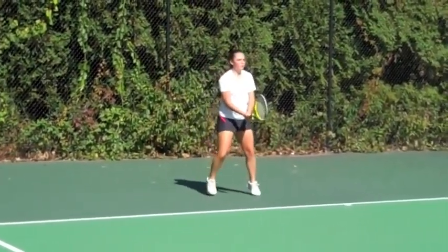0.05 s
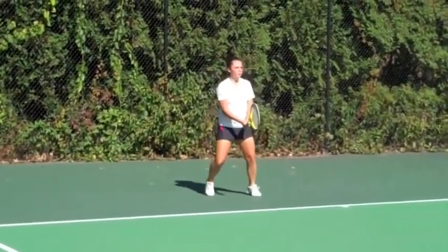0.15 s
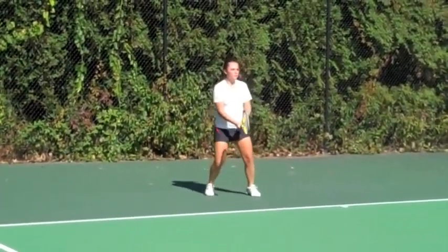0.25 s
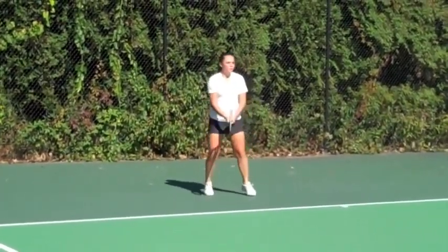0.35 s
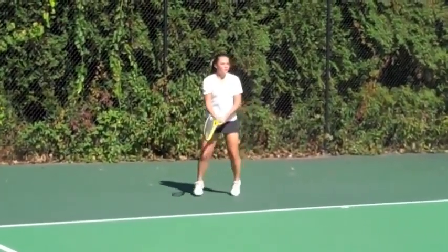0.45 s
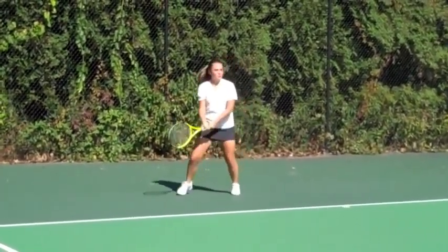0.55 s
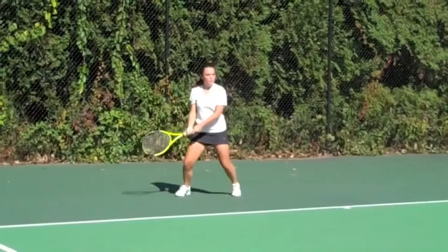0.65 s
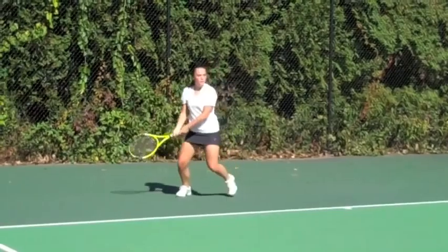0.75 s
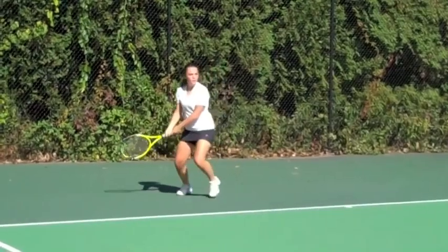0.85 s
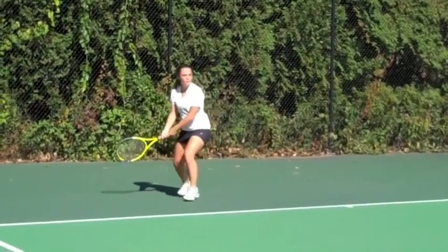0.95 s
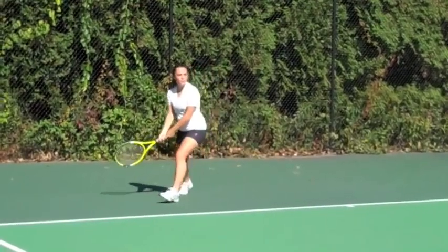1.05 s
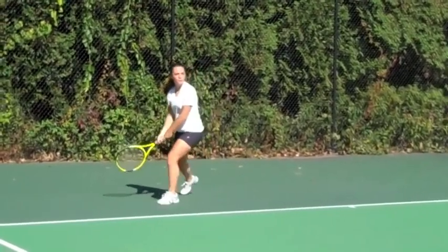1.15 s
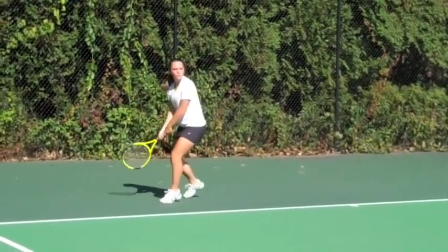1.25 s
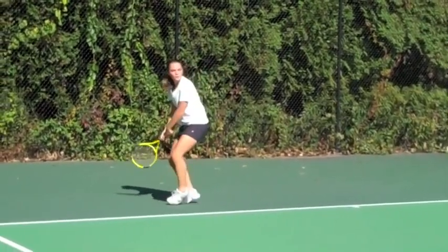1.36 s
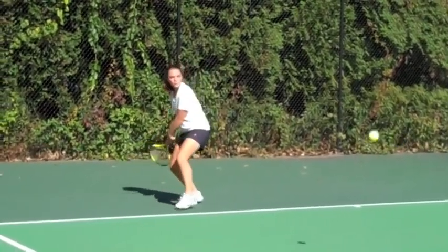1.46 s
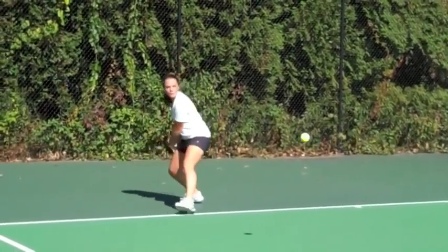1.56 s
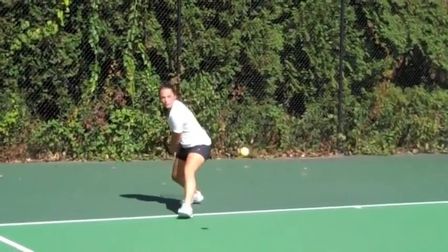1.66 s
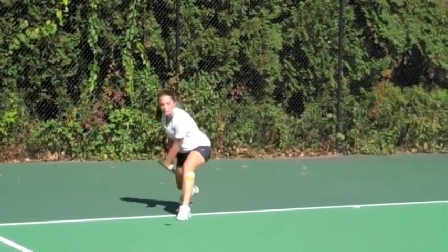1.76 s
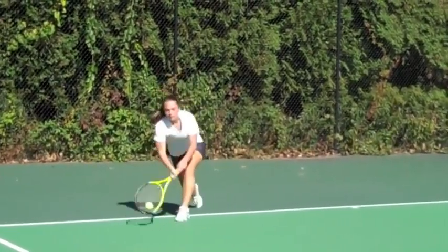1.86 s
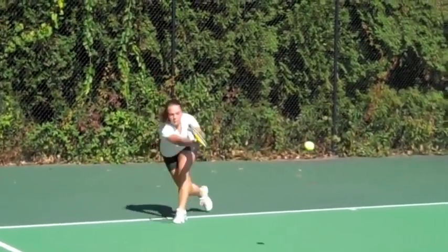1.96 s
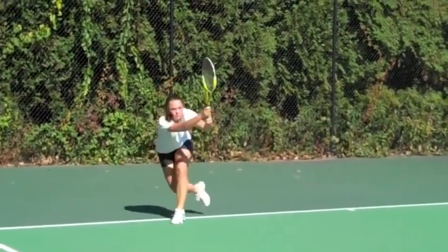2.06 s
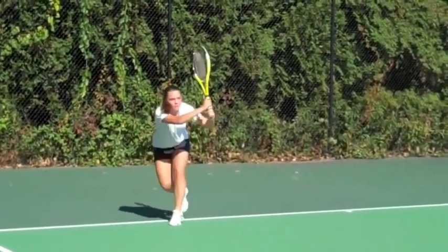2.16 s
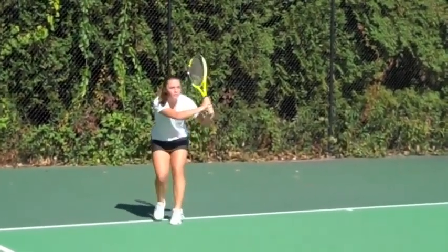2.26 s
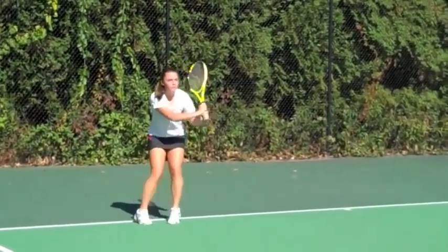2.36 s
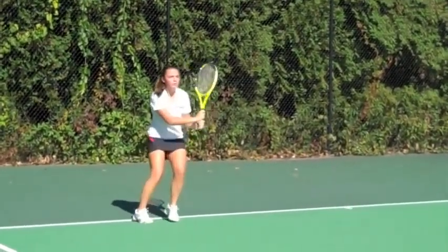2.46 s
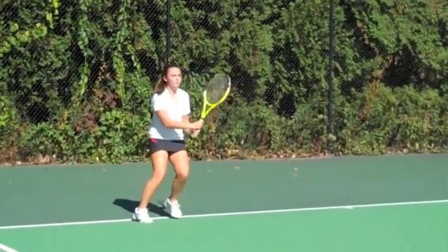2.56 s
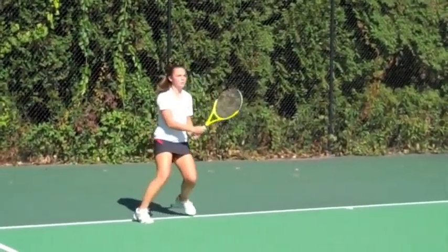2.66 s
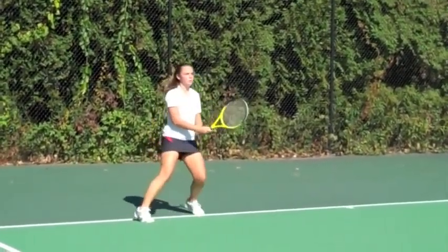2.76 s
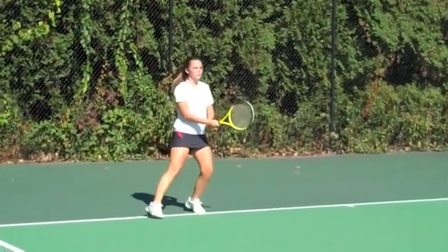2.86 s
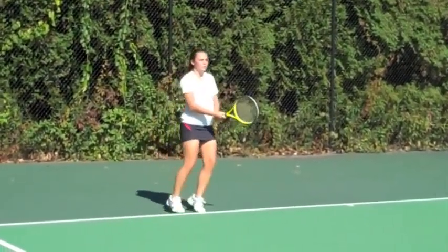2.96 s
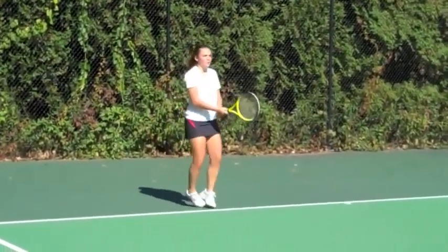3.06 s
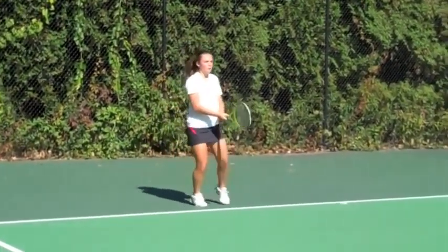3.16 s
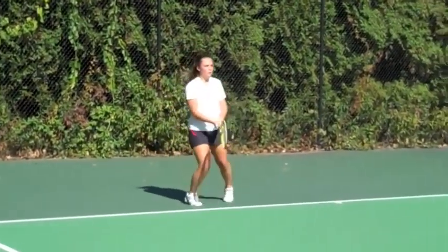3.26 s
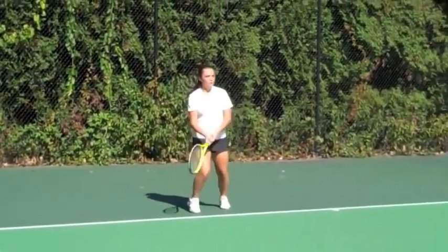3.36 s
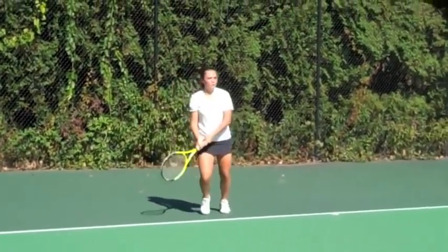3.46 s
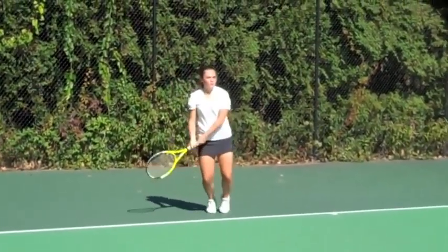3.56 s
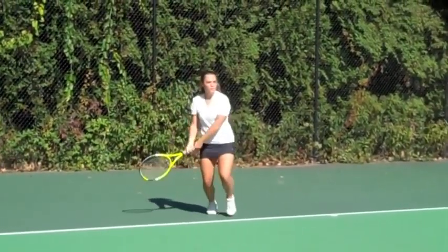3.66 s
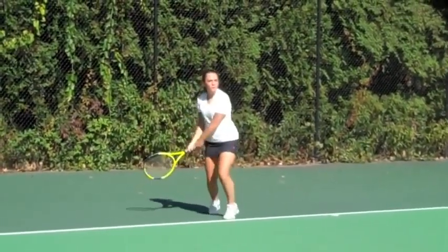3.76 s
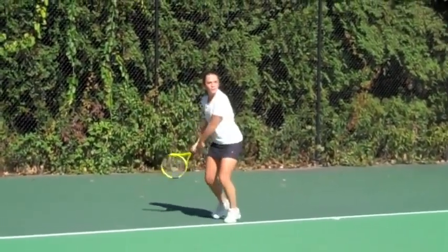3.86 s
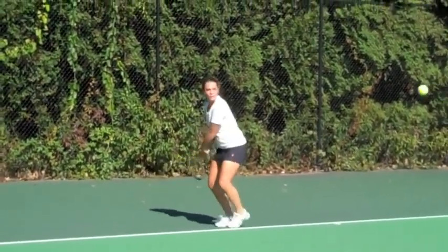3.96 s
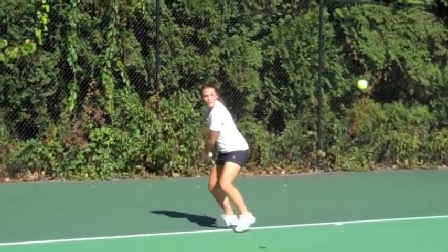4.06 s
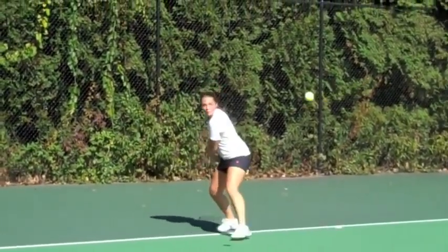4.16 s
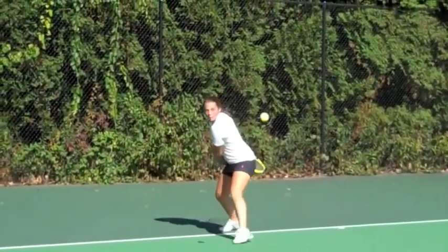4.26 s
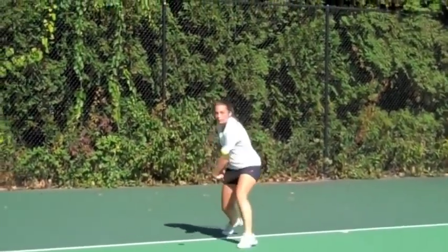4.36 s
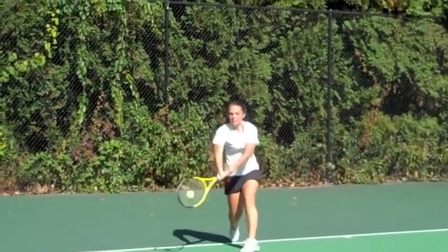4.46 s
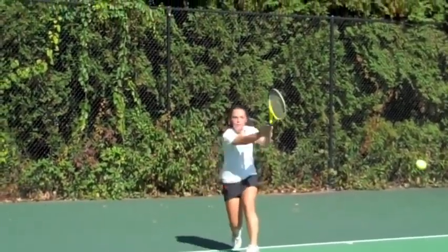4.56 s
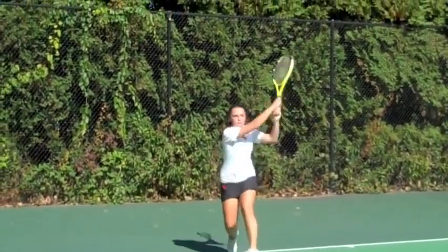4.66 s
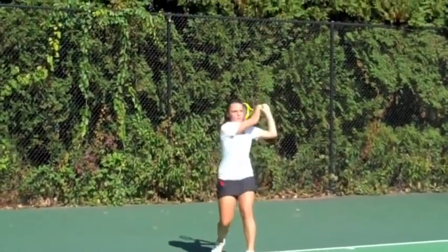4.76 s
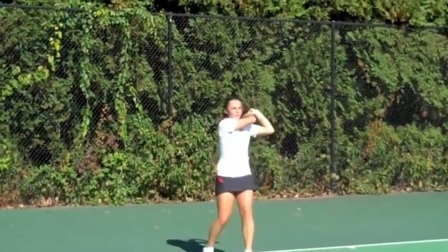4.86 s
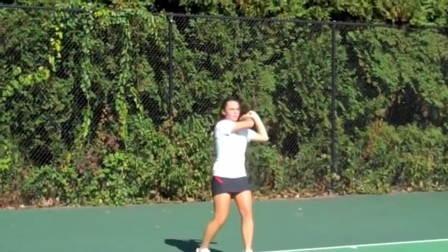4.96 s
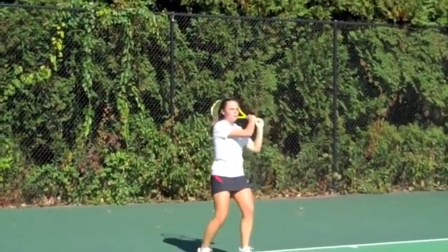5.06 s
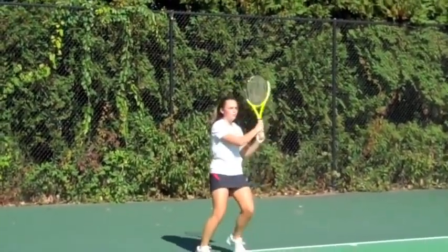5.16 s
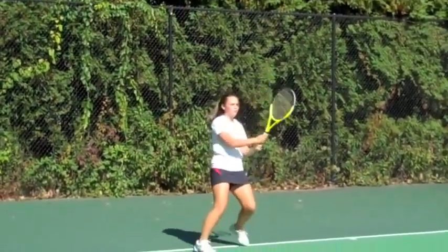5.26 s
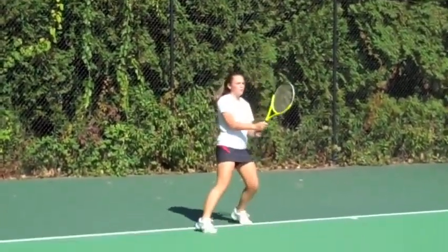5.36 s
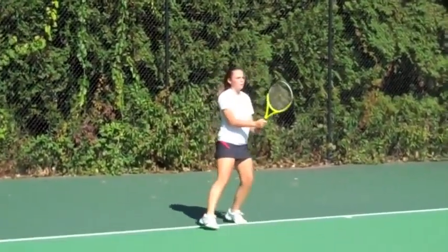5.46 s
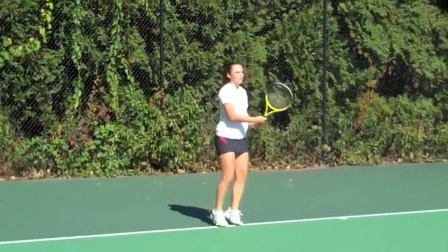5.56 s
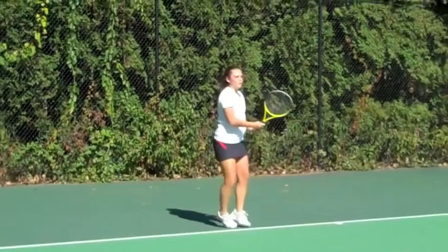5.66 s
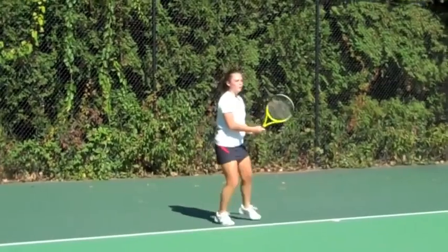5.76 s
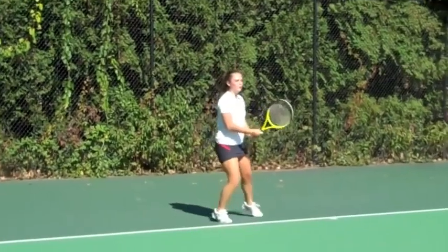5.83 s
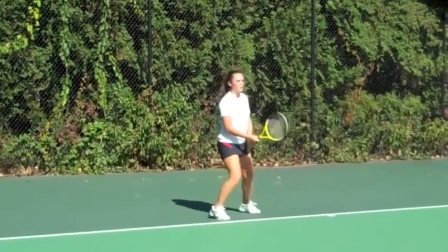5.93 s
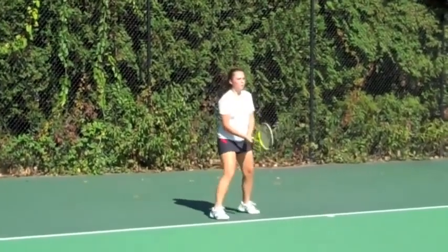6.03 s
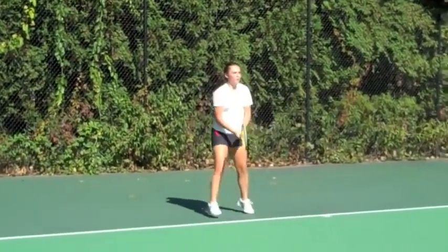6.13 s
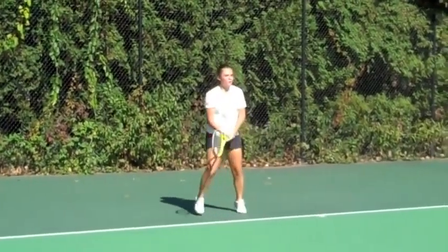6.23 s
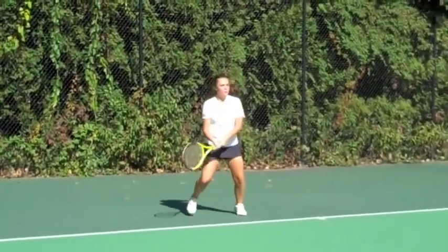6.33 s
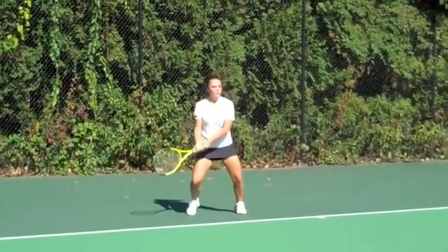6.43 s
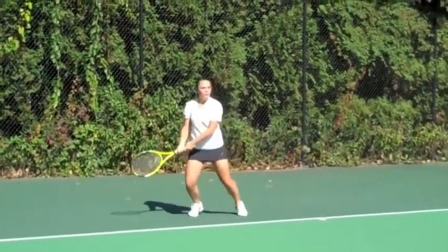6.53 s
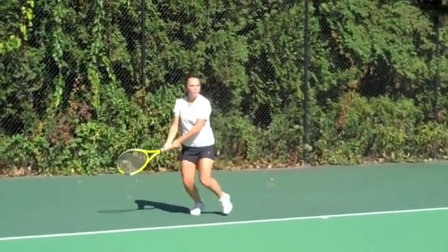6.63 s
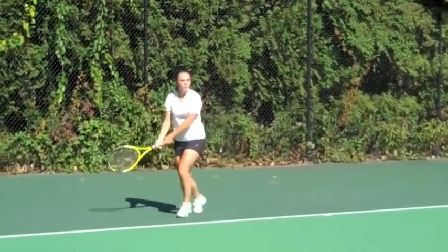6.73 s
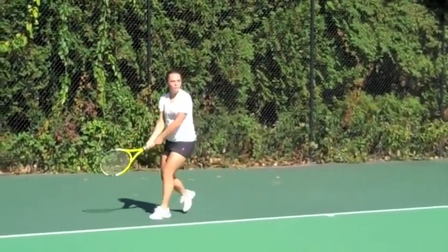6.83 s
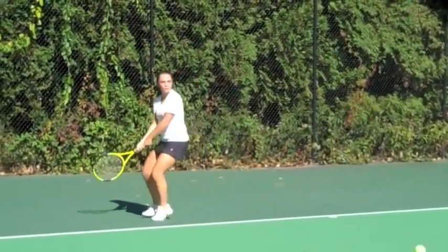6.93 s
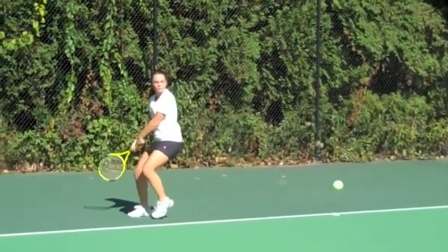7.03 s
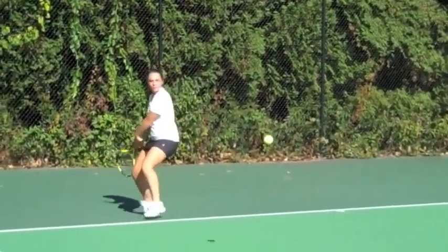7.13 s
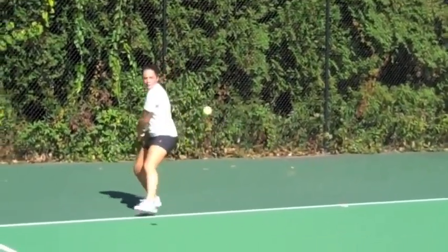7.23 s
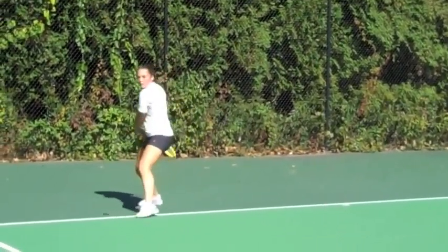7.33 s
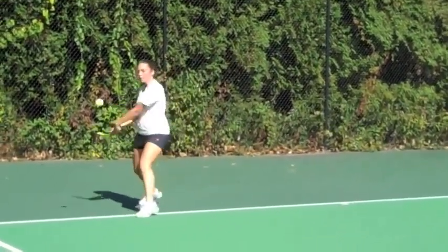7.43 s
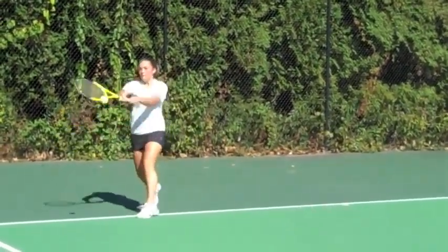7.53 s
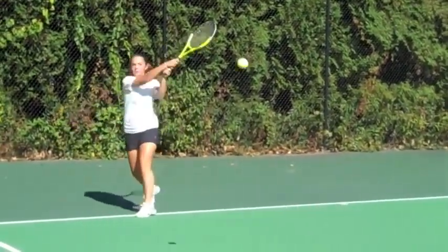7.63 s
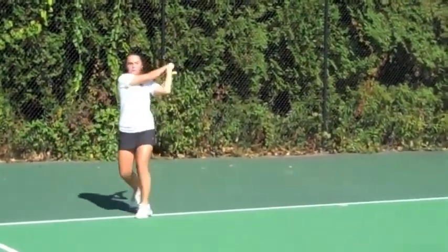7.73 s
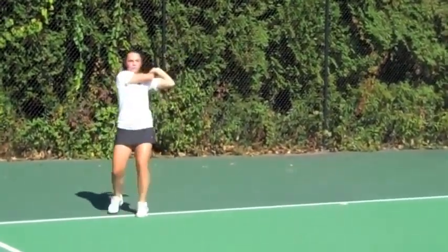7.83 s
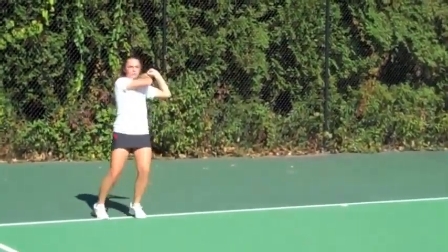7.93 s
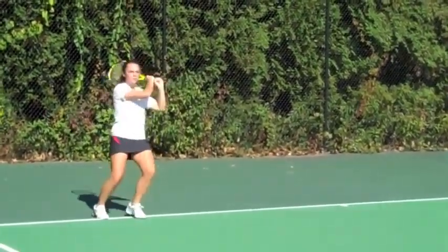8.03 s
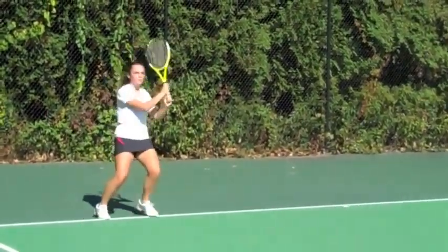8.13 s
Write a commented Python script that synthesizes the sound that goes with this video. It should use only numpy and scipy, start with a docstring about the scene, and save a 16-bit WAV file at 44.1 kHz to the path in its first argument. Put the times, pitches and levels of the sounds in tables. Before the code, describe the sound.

A tennis rally on an outdoor hard court, in stereo, over quiet traffic and faint hiss. A very faint far hit at 0.2 s is followed by light shoe scuffs, a weak far bounce and a clear slap at 1.1 s. At 1.9 s the near racket gives a loud, hollow, ringing pock with a diffuse hedge echo. A softer far hit answers at 2.8 s, overlapped by a dull distant thud that rolls away from 2.9 s. Scuffs lead to a strong bounce at 3.5 s, another at 3.8 s, then a loud stringy pock at 4.5 s. A fainter thud comes near 5 s, a bounce at 5.5 s and a weak far hit at 5.9 s. Footwork grates, a bounce slaps at 6.9 s, a shoe squeaks sharply at 7.0 s, and the last loud pock lands at 7.5 s, then a scuff and a faint low hum swelling.

```python
"""Outdoor tennis rally

Rackets pock (string crack, air push, ringing ball), the ball slaps the hard court and rings, shoes
scuff and squeak; strings swish as shaped noise. A tall hedge and fence return a late, diffuse echo
made of scattered noise. Two dull thuds roll round the surroundings; far squeaks, traffic, a hum and
a faint hiss lie underneath. The left microphone is the brighter one."""
import sys
import numpy as np
from scipy import signal
from scipy.fft import rfft, irfft, next_fast_len
from scipy.io import wavfile
from scipy.ndimage import map_coordinates

SR = 44100
rng = np.random.default_rng(int(sys.argv[2]) if len(sys.argv) > 2 else 0)


def materialize(psi):
    """Save the field psi as 16-bit PCM at rate SR to the path in sys.argv[1].

    A 1-D psi becomes a single channel; in a 2-D psi each row is a channel.
    """
    bounded = np.clip(np.atleast_2d(psi).T, -1, 1)
    quanta = np.round(bounded * 32767).astype(np.int16)
    wavfile.write(sys.argv[1], SR, quanta)


N = 361179
TIME_S = np.arange(N) / SR
AGE_S = TIME_S[:SR // 4]  # time since the start of one event
FLUTTER_DB = 2  # unevenness of scuffs and rolling echoes

# Colour of felt or sole rubbing on court grit. Each row: frequency in Hz, relative level in dB.
GRIT_COLOUR = [(300, -22), (1200, -11), (2500, -12), (4000, -3.5), (6200, 4.5), (8000, 4.5), (9500, -9),
               (13800, -20), (14800, -52)]
# Left-right likeness of echoes. Each row: frequency in Hz, likeness from 0 to 1.
ECHO_LIKENESS = [(300, 1), (1000, 0.89), (2500, 0.75), (6000, 0.067)]


def amp(db):
    """Decibels to gain."""
    return 10 ** (np.asarray(db) / 20)


def unit(x):
    """Scale to rms 1."""
    return x / np.sqrt(np.mean(x ** 2) + 1e-20)


def along(points, hz):
    """Interpolate (Hz, value) points on a log frequency axis."""
    point_hz, values = np.transpose(points)
    return np.interp(np.log(hz + 1), np.log(point_hz + 1), values)


def filtered(x, response):
    """Apply a frequency response, zero-padded by at least 0.1 s."""
    n = x.shape[-1]
    padded = next_fast_len(n + SR // 10)
    spectrum = rfft(x, padded) * response(np.fft.rfftfreq(padded, 1 / SR))
    return irfft(spectrum, padded)[..., :n]


def high_pass(x, hz):
    """Third-order high-pass: a small source radiates little bass."""
    return signal.sosfilt(signal.butter(3, hz, "highpass", fs=SR, output="sos"), x)


def noise(colour, shape):
    """Coloured noise of rms 1."""
    return unit(filtered(rng.standard_normal(shape), lambda hz: amp(along(colour, hz))))


def wobble(x):
    """Smooth random curve with one knot per unit of x."""
    return map_coordinates(rng.standard_normal(int(x.max()) + 4), [x])


def spread(pair, likeness):
    """Mix two unrelated noises into a left and right of given likeness."""
    def mid_side_gains(hz):
        angle = np.arccos(np.clip(along(likeness, hz), -1, 1)) / 2
        return np.array([np.cos(angle), np.sin(angle)])

    mid, side = filtered(pair, mid_side_gains)
    return np.array([mid + side, mid - side])


def click(colour):
    """Minimum-phase pulse of peak 1 with the given colour."""
    n = len(AGE_S)
    log_gain = np.log(amp(along(colour, np.fft.rfftfreq(n, 1 / SR))))
    cepstrum = irfft(log_gain, n)
    pulse = irfft(np.exp(rfft(2 * cepstrum[:n // 2], n)), n)
    return pulse / np.abs(pulse).max()


def swell(t, peak, rise, fall):
    """Bell-shaped envelope with its own rise and fall."""
    return np.exp(-np.minimum(((t - peak) / np.where(t < peak, rise, fall)) ** 2, 20))


def ring(hz, t60, start, attack):
    """Damped mode that builds up from its start; times in seconds."""
    u = np.maximum(AGE_S - start, 0)
    return np.sin(2 * np.pi * hz * u) * amp(-60 * u / t60) * (1 - np.exp(-u / attack))


def add(track, start_s, sound):
    """Mix an event into a track."""
    part = track[..., round(start_s * SR):][..., :len(AGE_S)]
    part += sound[..., :part.shape[-1]]


def strokes():
    """Strings crack and push the air while holding the ball; released, its hollow shell rings near 1 kHz.
    Returns the direct stereo sound and what radiates toward the hedge."""
    # Each row: start in seconds, end of the court, crack level in dB, ball level in dB (before the
    # 5.5 dB lift and high-pass), ball Hz, ball t60 in s, push level in dB, push Hz, string level in dB.
    stroke_rows = [(0.2264, "far", -47, -20.5, 1237, 0.014, -32.5, 230, -50),
                   (1.9025, "near", -14.5, 14.5, 958, 0.0095, -3.5, 534, -41),
                   (2.7765, "far", -23.5, 0.5, 1027, 0.029, -18, 486, -38),
                   (4.5054, "near", -11.5, -8, 907, 0.022, -12, 387, -25.5),
                   (5.9286, "far", -37.5, -12, 1160, 0.0077, -32, 269, -47.5),
                   (7.5340, "near", -12.5, 7.5, 1076, 0.014, -18, 330, -37)]
    # String-bed modes. Each row: Hz, relative level in dB, t60 in s.
    string_modes = [(501, 5, 0.027), (1110, 4, 0.047), (1418, -2, 0.11), (1600, -6, .025), (1866, 6, 0.041),
                    (2080, 7, 0.022), (2275, 6, 0.085), (2590, -28, .04), (3760, -27, .035),
                    (4530, -25, .025)]
    # Crack spectrum. Each row: Hz, relative level in dB.
    crack_colour = [(200, -40), (750, 2), (1400, 8.5), (2000, -2), (3000, -4), (3700, -2.5), (5000, -1.5),
                    (6500, 1), (8200, -2), (10000, -13.5), (14000, -20.5), (16500, -53)]
    # Each end of the court: lag of the left microphone in samples, extra way to the hedge in s,
    # ring toward the hedge over the crack in dB.
    court_ends = {"near": (0.56, 0, 15.6), "far": (7.3, 0.051, 22)}
    dwell_s, push_half_s = 0.0034, 0.0015  # ball on the strings; half length of the air push
    ground_delay_s, ground_db = 0.0063, -17  # the court's reflection
    out, away = np.zeros((2, N)), np.zeros(N)
    contact = swell(AGE_S, 0.0017, 0.0009, 0.0031) + amp(-15) * amp(-60 * AGE_S / 0.04)
    for start_s, end, crack_db, ball_db, ball_hz, ball_t60_s, push_db, push_hz, string_db in stroke_rows:
        lag, way_s, away_db = court_ends[end]
        crack_noise = spread(noise(crack_colour, (2, len(AGE_S))), [(1500, 0.66), (8000, 0.9)])
        crack = amp(crack_db) * contact * crack_noise
        push = np.sin(2 * np.pi * push_hz * (0.0024 - AGE_S))
        push = amp(push_db) * push * swell(AGE_S, 0.0028, push_half_s, push_half_s)
        shell = ring(ball_hz, ball_t60_s, dwell_s, attack=0.0032)
        ball = amp(ball_db + 5.5) * high_pass(shell, hz=770)
        strings = np.zeros(len(AGE_S))
        for hz, db, t60_s in string_modes:
            mode_gain = amp(db + rng.normal(0, 1))
            strings += mode_gain * ring(hz, t60_s, rng.uniform(0.001, 0.00162), attack=0.0009)
        strings *= amp(string_db)
        pock = high_pass(crack + push + strings, hz=142) + ball
        # half the lag delays the left, half advances the right
        sides = np.array([[-1], [1]])
        pock = filtered(pock, lambda hz: np.exp(1j * np.pi * hz * lag / SR * sides))
        add(out, start_s, pock)
        add(out, start_s + ground_delay_s, amp(ground_db) * pock)
        add(away, start_s + way_s, high_pass(crack[0] + push + amp(-5) * strings, hz=140))
        away_ring = ring(hz=971, t60=0.046, start=dwell_s, attack=0.0031)
        add(away, start_s + way_s, amp(crack_db + away_db) * away_ring)
    return out, away


def bounces():
    """The ball slaps the court, rings briefly and skids on its felt."""
    # Each row: start in seconds, slap level in dB (before a 1.5 dB cut), shell ring level in dB.
    bounce_rows = [(0.562, -35, -36), (1.0743, -15.5, -19), (1.15, -28, -52), (1.731, -27.5, -58),
                   (3.548, -9, -19), (3.8037, -19, -35), (5.496, -25, -29), (6.427, -36, -30),
                   (6.8992, -13, -17.5), (7.326, -45, -35.5), (7.3455, -25, -54)]
    # Slap spectrum. Each row: Hz, relative level in dB.
    slap_colour = [(60, -38), (200, 7.5), (400, -2.5), (700, -12.5), (1400, 4.5), (2300, 3), (3500, -9),
                   (5000, -10), (6800, -1), (9500, -19), (15000, -32)]
    shell_hz, skid_db = 1014, -39  # skid level relative to the slap column
    out, slap = np.zeros(N), click(slap_colour)
    for start_s, slap_db, ring_db in bounce_rows:
        shell = amp(ring_db) * ring(shell_hz, t60=0.023, start=0.00015, attack=0.0006)
        skid_envelope = swell(AGE_S, 0.0025, 0.021, 0.02)
        skid = amp(slap_db + skid_db) * noise(GRIT_COLOUR, len(AGE_S)) * skid_envelope
        add(out, start_s, amp(slap_db - 1.5) * slap + shell + skid)
    return out


def footwork():
    """Soles catch, drag over grit in tiny slips and let go; more weight adds a lower rasp."""
    # Each row: start in seconds, length in s, mid-scuff level in dB, swell from start to end in dB,
    # heel weight in dB (before a 3.5 dB cut).
    scuff_rows = [(0.128, 0.033, -38, -2, -15), (.17, .036, -43.5, -4, -4.5), (0.51, 0.018, -47.5, -3, -17),
                  (1.38, 0.032, -37.5, 11, -12), (1.666, 0.021, -42, 4, 1), (2.38, 0.028, -34.5, 2, -6),
                  (2.914, 0.016, -30, -11, -4), (3.125, 0.011, -36.5, -2, -4),
                  (3.226, 0.079, -38.5, 9, -27), (3.549, 0.032, -36, -8, -19), (3.966, .02, -41.5, 8, -7),
                  (4.874, 0.059, -39.5, -6, -6.5), (5.676, .029, -37, 4, -2),
                  (5.877, 0.026, -43.5, -2, -15), (6.21, .048, -50, 9, -5.5), (6.423, 0.097, -50, 8, -4),
                  (6.809, 0.034, -37.5, 24, -6), (6.999, .034, -30, 1, -2.5),
                  (7.897, 0.051, -34.5, -10.5, -0.5), (8.087, 0.02, -50.5, 1, -16)]
    # Lower rasp of the weighted sole. Each row: Hz, relative level in dB.
    sole_colour = [(150, -30), (500, -18), (1100, -4.5), (1900, -1), (2700, 2), (4000, 0), (7000, -44)]
    grip_s, release_s = 0.0016, 0.0035  # the sole catches and lets go
    slip_db, ripple_db = 1.8, 1.8  # unevenness of slips and of tread colour
    out, n = np.zeros((2, N)), len(AGE_S)
    for start_s, length_s, db, swell_db, heel_db in scuff_rows:
        release = 1 + np.exp(np.minimum((AGE_S - length_s) / release_s, 30))
        grip = (1 - np.exp(-AGE_S / grip_s)) / release
        drag = amp(db + swell_db * (np.minimum(AGE_S / length_s, 1) - 0.5)) * grip
        slips = unit(amp(slip_db * wobble(1500 * AGE_S) + FLUTTER_DB * wobble(200 * AGE_S)))
        rasp = spread(noise(GRIT_COLOUR, (2, n)), [(2000, 1.0), (8000, 0.75)])
        rasp = rasp + amp(heel_db - 3.5) * noise(sole_colour, n)
        # each footfall has its own resonances
        tread = filtered(rasp, lambda hz: amp(ripple_db * wobble(hz / 400)))
        add(out, start_s, drag * slips * tread)
    return high_pass(out, hz=305)


def swings():
    """Air rushes through the strings around a stroke: noise under a bell envelope."""
    # Each row: peak in seconds, half length in s, level in dB.
    swing_rows = [(1.835, 0.034, -44.5), (4.506, 0.081, -45.5), (7.528, 0.1, -49)]
    # Swish spectrum. Each row: Hz, relative level in dB.
    swish_colour = [(300, -30), (1500, -6), (2400, -1.5), (4000, -5), (7000, 0.5), (10000, -15),
                    (13500, -21), (15000, -58.5)]
    envelope = sum(amp(db) * swell(TIME_S, peak_s, half_s, half_s) for peak_s, half_s, db in swing_rows)
    return noise(swish_colour, N) * envelope


def squeaks(rows, modes):
    """Stick and slip drives narrow resonances of the rubber sole, here as noise through those modes."""
    def rubber(hz):
        return sum(amp(db) / (1 + ((hz - mode_hz) / width_hz) ** 2) for mode_hz, width_hz, db in modes)

    tone = unit(filtered(rng.standard_normal(N), rubber))
    return tone * sum(amp(db) * swell(TIME_S, peak_s, rise_s, fall_s) for peak_s, rise_s, fall_s, db in rows)


def near_squeaks():
    """A sole gripping the court, then its lingering echo."""
    # Each row: peak in seconds, rise in s, fall in s, level in dB.
    squeak_rows = [(7.022, 0.0072, 0.0092, -21.5), (7.06, 0.039, 0.18, -51)]
    # Sole resonances. Each row: Hz, width in Hz, relative level in dB.
    sole_modes = [(2646, 71, 3.5), (2764, 65, 1), (3050, 66, 2.5), (3330, 65, 0.5), (5930, 130, -21),
                  (7640, 220, -16)]
    return squeaks(squeak_rows, sole_modes)


def hedge(x, blur):
    """Countless leaves scatter sound back late: each band's energy returns as noise, blurred in pitch."""
    # Echo colour. Each row: Hz, gain in dB.
    echo_colour = [(100, -17), (400, -16.5), (700, -21.5), (1000, -19.5), (1400, -17), (2200, -13),
                   (4500, -10.5), (8000, -11), (13000, -21.5)]
    clump_db = 2.8  # unevenness of the echo
    hz, t, z = signal.stft(x, SR, nperseg=512, noverlap=384)
    shifted_hz = hz + 50
    blur_width = blur * np.sqrt(shifted_hz[:, None] / 1000)
    weights = np.exp(-(np.log(shifted_hz[:, None] / shifted_hz) / blur_width) ** 2)
    power = weights @ np.abs(z) ** 2 / weights.sum(axis=1, keepdims=True)
    power = signal.fftconvolve(power, echo_power(t[t < 1])[None], axes=1)
    power = np.abs(power)[:, :len(t)]
    paths = signal.stft(rng.standard_normal((2, N)), nperseg=512, noverlap=384)[2]
    echo = paths / paths.std() * np.sqrt(power) * amp(along(echo_colour, hz))[:, None]
    scattered = signal.istft(echo, nperseg=512, noverlap=384)[1][:, :N]
    clumps = unit(amp(clump_db * wobble(90 * TIME_S)))  # branches return it unevenly
    return clumps * spread(scattered, ECHO_LIKENESS)


def echo_power(delay_s):
    """Share of the energy that comes back at each delay: fence, hedge, then a dying tail."""
    # Fence and hedge returns. Each row: peak delay in seconds, rise in s, fall in s, relative level in dB.
    return_rows = [(.045, .02, 0.051, 2), (0.108, 0.16, 0.087, -1)]
    linger_db, linger_rise_s, linger_t60_s = -4.5, 0.02, 2.14  # weak tail from further off
    near = sum((amp(db) * swell(delay_s, s, rise_s, fall_s)) ** 2 for s, rise_s, fall_s, db in return_rows)
    tail = amp(linger_db - 60 * delay_s / linger_t60_s) * (1 - np.exp(-delay_s / linger_rise_s))
    power = near + tail ** 2
    return power / power.sum()


def thuds():
    """A dull blow, one strong return, then a hollow, fluttering echo rolling away."""
    # Each row: start in seconds, blow level in dB, rolling echo level in dB, strong return level in dB.
    thud_rows = [(2.9, -35, -42.5, -37), (4.958, -38, -46, -47.5)]
    # Blow spectrum. Each row: Hz, relative level in dB.
    blow_colour = [(50, -28), (140, 2.5), (300, -12), (550, -1.5), (900, -5), (1500, -5), (2500, -46)]
    # Spectrum of the echoes. Each row: Hz, relative level in dB.
    roll_colour = [(150, -38), (350, -1.5), (580, 6), (850, 6.5), (1150, -3.5), (1600, -4.5), (2400, -19.5),
                   (5000, -55)]
    return_delay_s = 0.1554
    blows, rolls = np.zeros(N), np.zeros(N)
    for start_s, blow_db, roll_db, return_db in thud_rows:
        blows += amp(blow_db) * swell(TIME_S, start_s + 0.0047, 0.0023, 0.021)
        rolls += amp(roll_db) * (TIME_S > start_s) * swell(TIME_S, start_s + 0.21, 0.38, 0.19)
        rolls += amp(return_db) * swell(TIME_S, start_s + return_delay_s, 0.003, 0.0093)
    flutter = amp(FLUTTER_DB * wobble(60 * TIME_S))
    echoes = rolls * flutter * spread(noise(roll_colour, (2, N)), ECHO_LIKENESS)
    return blows * noise(blow_colour, N) + echoes


def far_squeaks():
    """Squeaks from the far court."""
    # Each row: peak in seconds, rise in s, fall in s, level in dB.
    far_rows = [(0.65, 0.08, 0.19, -57), (6.62, 0.18, 0.12, -56.5)]
    # Sole resonances. Each row: Hz, width in Hz, relative level in dB.
    far_modes = [(2630, 150, -1.5), (4840, 180, 1.5), (7480, 140, 4.5)]
    return squeaks(far_rows, far_modes)


def outdoors(hiss_db, hum_hz):
    """Traffic that swells once, an even hiss and a far engine's wavering hum."""
    # Spectrum of the outdoor air. Each row: Hz, relative density in dB per Hz.
    air_colour = [(12, -52), (20, -8.5), (289, -3), (413, -8.5), (474, -5), (529, -7), (591, -6.5),
                  (1050, -10.5), (1550, -15), (2610, -18), (3840, -18.5), (4920, -18.5), (5650, -17.5),
                  (7650, -17), (14400, -37.5)]
    # Each row: Hz, left-right likeness from 0 to 1.
    air_likeness = [(60, 0.84), (150, 0.99), (380, 0.93), (950, 0.76), (2380, 0.077), (5980, 0.01),
                    (15000, 0.01)]
    # One swell of the traffic: peak in seconds, rise in s, fall in s, gain in dB.
    traffic_swell = (3.85, 1.3, 1.3, 2.9)
    # One swell of the engine: peak in seconds, rise in s, fall in s, gain in dB.
    hum_swell = (7.8, 0.4, 0.17, 10)
    traffic_db, hum_db = -54.5, -69  # resting levels
    air_top_hz = 14400
    air = filtered(spread(noise(air_colour, (2, N)), air_likeness), lambda hz: hz < air_top_hz)
    low = filtered(air, lambda hz: 1 / (1 + (hz / 1200) ** 2))
    traffic = passing(traffic_db, *traffic_swell) * unit(low)
    hiss = amp(hiss_db) * unit(air - low)
    hum = unit(np.sin(2 * np.pi * hum_hz * TIME_S + wobble(6 * TIME_S)))
    return traffic + hiss + passing(hum_db, *hum_swell) * hum


def passing(rest_db, peak_s, rise_s, fall_s, gain_db):
    """Gain of a steady far source that swells once."""
    return amp(rest_db + gain_db * swell(TIME_S, peak_s, rise_s, fall_s))


def ports(x, balance):
    """Share a sound between the two microphones, band by band."""
    sides = np.array([[-1], [1]])
    return filtered(x, lambda hz: 2 / (1 + amp(sides * along(balance, hz))))


def scene():
    """The rally, its echo and the surroundings."""
    # Balance of sound from the court. Each row: Hz, left minus right in dB.
    court_balance = [(100, 1.5), (1000, 1.5), (2500, 1.5), (4000, 1), (5800, -3), (6700, -1.5),
                     (7800, 22.5), (10000, 9), (14000, 20)]
    # Balance of sound from all around. Each row: Hz, left minus right in dB.
    diffuse_balance = [(60, 0), (110, 1), (200, 1), (380, 1.5), (700, 1.0), (1290, 1.0), (2380, 2.5),
                       (4400, -0.5), (8120, 10), (15000, -3.5)]
    pocks, away = strokes()
    court = bounces() + footwork() + swings()
    far = thuds() + far_squeaks() + outdoors(hiss_db=-56, hum_hz=96)
    echo = hedge(away + court.mean(axis=0), blur=0.035)
    direct = pocks + court + near_squeaks()
    return ports(direct, court_balance) + ports(echo + far, diffuse_balance)


def record(dry):
    """Softly clipped peaks and a band limit."""
    top_hz = 16500
    x = dry / (1 + np.abs(dry) ** 6) ** (1 / 6)
    return filtered(x, lambda hz: hz < top_hz)


dry = scene()
out = record(dry)
materialize(out)
```